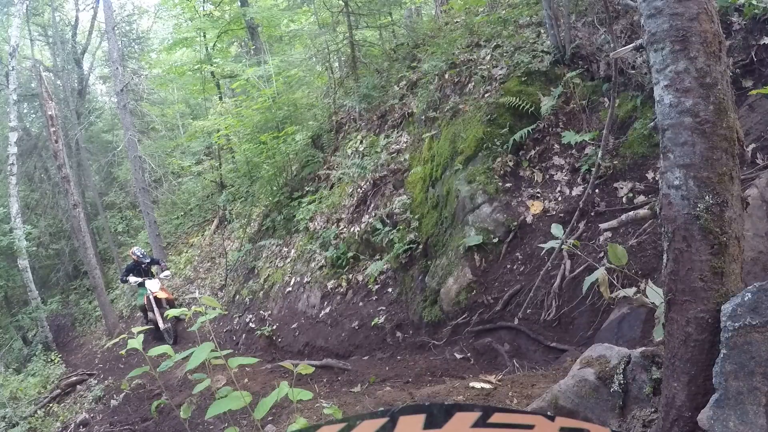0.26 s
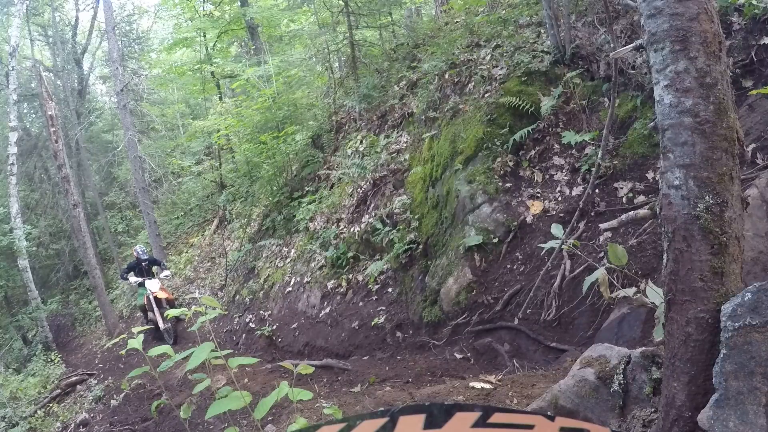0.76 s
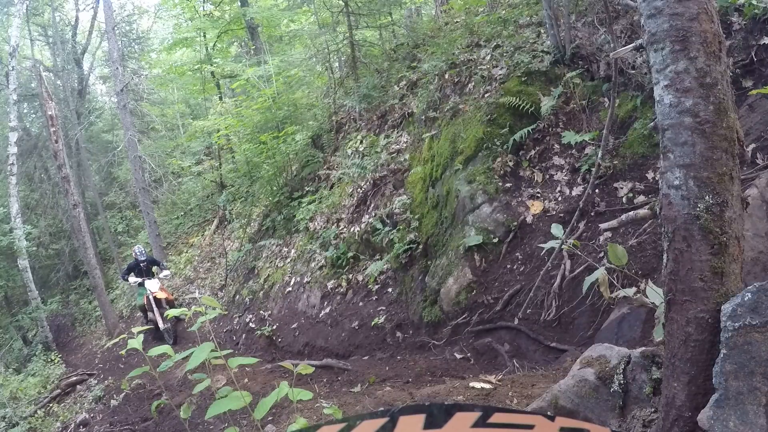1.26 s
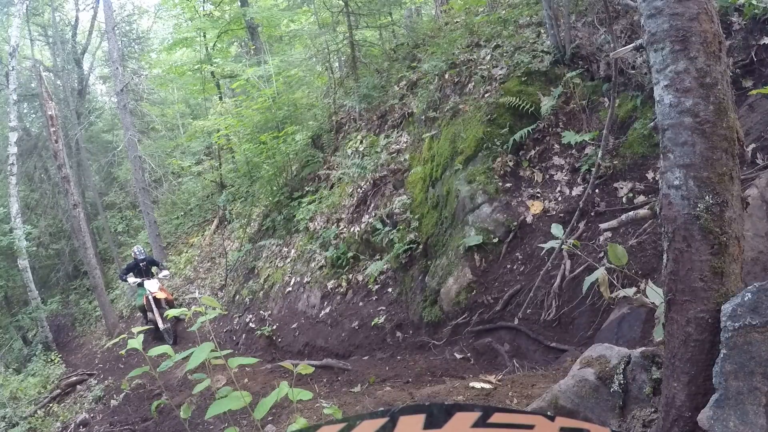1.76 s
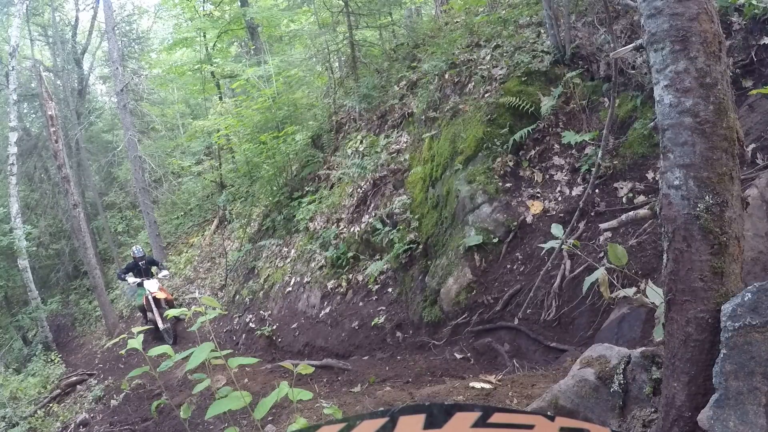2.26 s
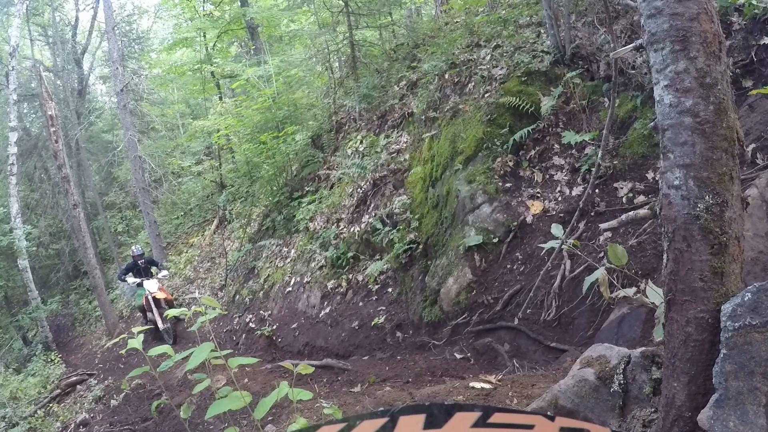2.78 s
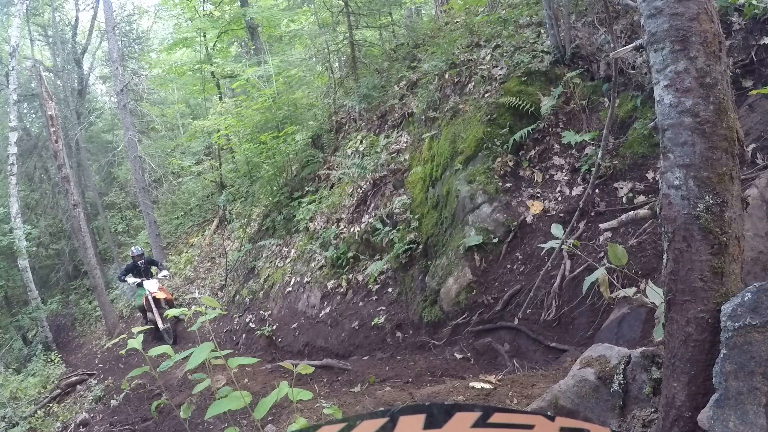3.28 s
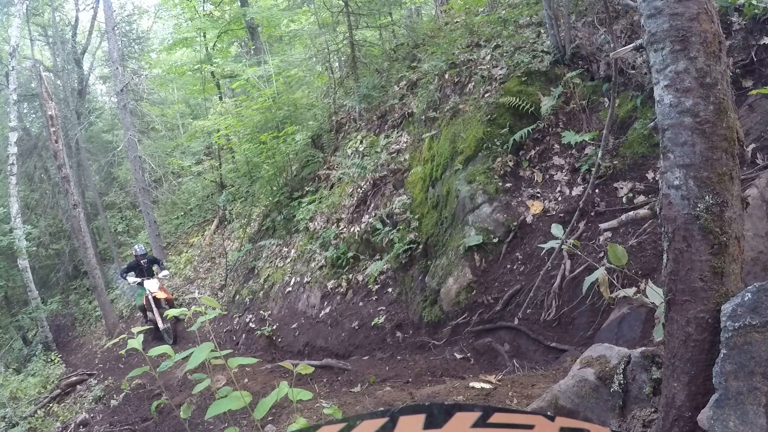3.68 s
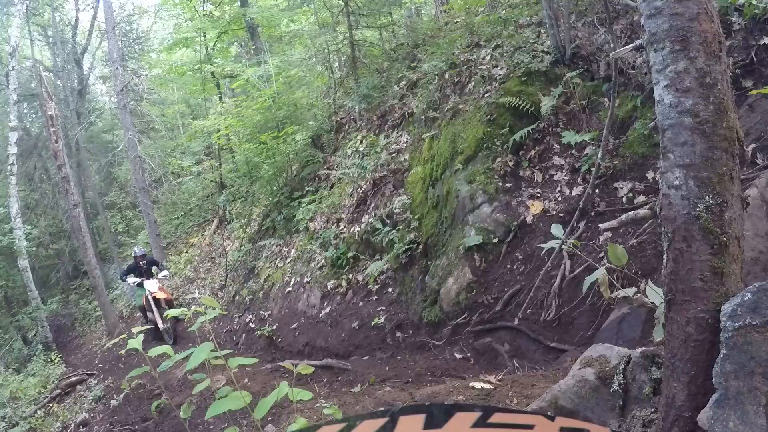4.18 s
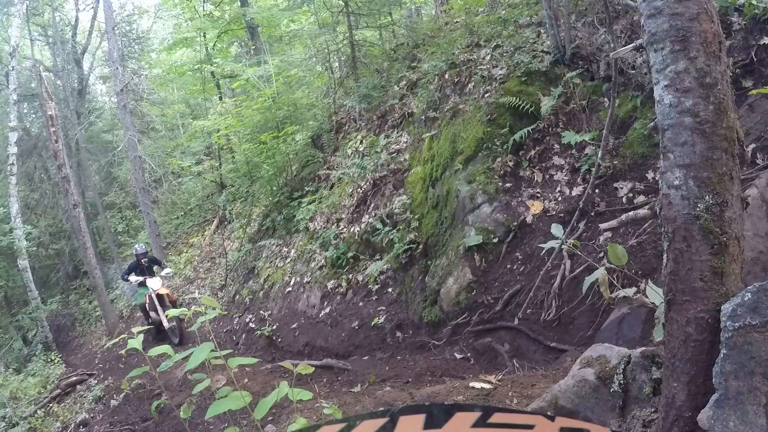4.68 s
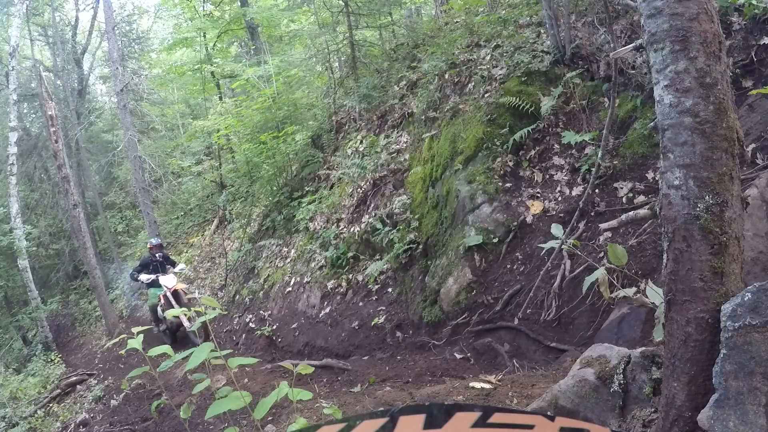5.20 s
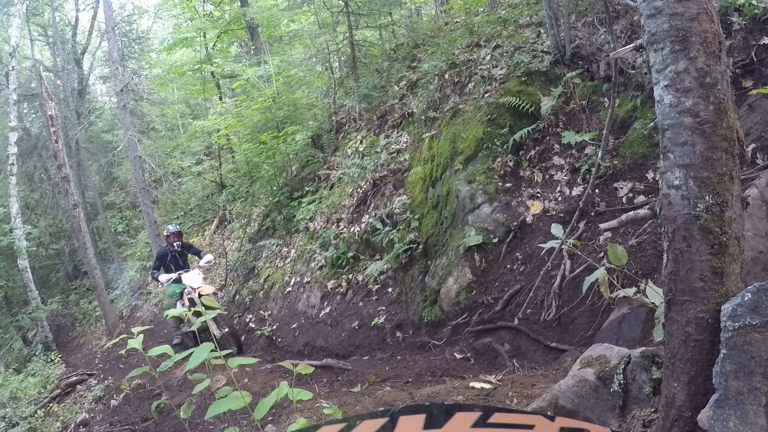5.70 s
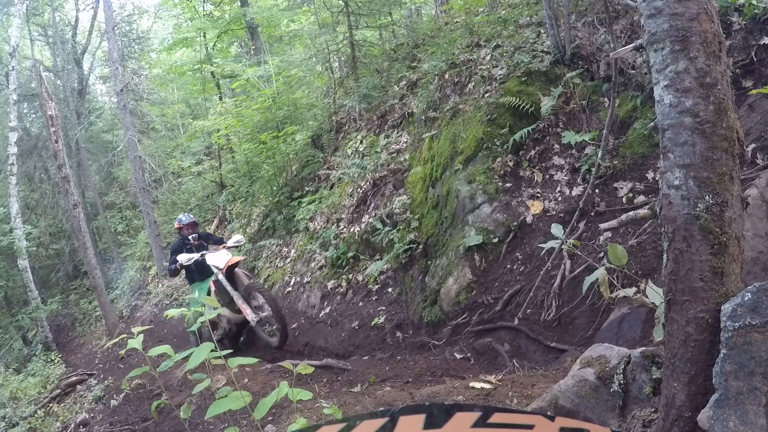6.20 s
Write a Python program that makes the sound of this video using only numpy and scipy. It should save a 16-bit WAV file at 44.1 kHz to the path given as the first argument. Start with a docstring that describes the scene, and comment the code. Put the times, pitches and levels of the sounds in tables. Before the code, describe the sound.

Soft forest hush, then a starter whirrs and knocks with hollow puffs from the exhaust. A two-stroke dirt bike catches with crackling pops and is blipped several times, winding down between blips with metallic rattle. Finally it revs hard and holds a harsh, ringing, wavering buzz to the end. Outdoors, short scattered echoes from trees, low wind rumble on the microphone; the left side is thinner and muffled.

```python
"""In a forest gully, a two-stroke trail bike is cranked, catches, is blipped with misfires, then revs hard uphill.
Each turn of the crank sends a pulse down the exhaust and rattles the cylinder and engine cases.
Strong single firings crack and thump; scattered echoes from the trees answer.
The left microphone port is muffled, inverted and a little late; wind rumbles in both ports."""
import sys
import numpy as np
from scipy import signal
from scipy.fft import rfft, irfft, next_fast_len
from scipy.io import wavfile
from scipy.ndimage import uniform_filter1d, map_coordinates

SR = 44100
rng = np.random.default_rng(int(sys.argv[2]) if len(sys.argv) > 2 else 0)


def transcribe(u):
    """Save the signal u as a 16-bit wav file named by the first command-line argument.

    u: samples, shape (n,) or (channels, n), limited to [-1, 1]; the rate is SR.
    q: integer samples, one column per channel.
    """
    v = np.clip(np.atleast_2d(u).T, -1, 1)
    q = np.round(v * 32767).astype(np.int16)
    wavfile.write(sys.argv[1], SR, q)


N = 284445

# All levels in the tables are relative: each layer gets a further boost or cut where it is used.
# Single strong firings among the misfires. Each row: time in seconds, level in dB, level of its crack in dB.
BANGS = [(1.266, -11.5, -43), (1.312, -19, -48), (1.331, -23, -38), (1.369, -19, -35), (1.394, -21, -38),
         (1.412, -18, -32.5), (1.427, -10.5, -37), (1.446, -19, -32), (1.466, -10, -24), (1.483, -15, -47),
         (1.924, -15, -59), (1.947, -18, -41), (1.966, -11, -31), (1.987, -9, -31), (2.007, -14, -45),
         (2.022, -8.5, -24.5), (2.04, -10, -35), (2.056, -14.5, -30), (2.07, -15, -27), (2.363, -20, -55),
         (2.379, -19, -50), (2.404, -12.5, -30), (2.421, -13, -32), (2.435, -15, -33), (2.452, -16, -35),
         (2.465, -9.5, -32), (2.478, -12, -27), (2.498, -20, -24.5), (2.513, -15, -24), (3.034, -18, -39),
         (3.069, -12, -26.5), (3.136, -13, -31), (3.207, -16, -26.5), (3.471, -22.5, -38),
         (3.494, -12.5, -31), (3.516, -21, -39), (3.542, -14, -27.5), (3.561, -22, -38), (3.579, -12, -35),
         (3.6, -13, -26), (3.619, -13, -42), (3.672, -15.5, -35), (3.934, -23, -49), (3.957, -16, -27.5),
         (3.978, -19, -60), (4.003, -14, -31.5), (4.05, -17.5, -32), (4.089, -15, -31), (4.127, -11.5, -32),
         (4.149, -15, -35), (4.182, -13.5, -31.5), (4.201, -11, -39)]
# Colour of the low exhaust pulse. Each row: frequency in Hz, level in dB.
BOOM = [(40, -39.5), (90, -9.5), (150, -0.5), (215, -1), (270, -4.5), (330, -10.5), (390, -19), (600, -59),
        (4000, -110)]
# Colour of the harsher, higher exhaust pulse. Each row: frequency in Hz, level in dB.
BARK = [(330, -61.5), (410, -16), (480, 5), (540, 4), (600, -2.5), (650, -0.5), (740, -7.5), (830, -7.5),
        (930, -24), (1080, -11), (1160, -22), (1250, -33), (1600, -20.5), (1900, -39), (2500, -36),
        (3500, -81), (9000, -110)]
# Colour of the rattling engine. Each row: frequency in Hz, level in dB.
RATTLE = [(100, -11), (250, -7), (390, -8), (550, 0.5), (760, -2), (920, -4.5), (1080, -2), (1260, -12.5),
          (1450, -4), (1600, -2.5), (1900, -3), (2200, -9.5), (2500, -13), (3000, -19.5), (3600, -20),
          (4500, -55.5)]
# Colour of the bright cooling fins. Each row: frequency in Hz, level in dB.
FINS = [(2300, -34), (2700, -24), (3100, -16), (3700, -12), (4400, -14.5), (5200, -7), (6000, -2.5),
        (6600, -6), (7300, -9.5), (8000, -15.5), (10000, -22), (12000, -33.5), (14500, -42.5)]
# Colour of the quiet forest, also of the right channel's own noise. Each row: frequency in Hz, level in dB.
WOODS = [(15, -36), (108, -46), (135, -1), (170, -1), (400, -3), (900, -5), (2000, -14.5), (4300, -26),
         (6500, -22), (9500, -25), (12000, -31), (14800, -38)]


def amp(db):
    """Turn decibels into a plain multiplier."""
    return 10 ** (np.asarray(db) / 20)


def unit(x):
    """Scale a sound to an rms of 1."""
    return x / np.sqrt(np.mean(x ** 2, axis=-1, keepdims=True) + 1e-20)


def along(points, hz):
    """Read a value between (Hz, value) points on a log frequency axis."""
    f, v = np.transpose(points)
    return np.interp(np.log(hz + 1), np.log(f + 1), v)


def curves(rows):
    """One value per sample for each column, then a gate that is open while the table lasts."""
    s, *cols = np.transpose(rows)
    t = np.arange(N) / SR
    gate = np.clip(np.minimum(t - s[0], s[-1] + .03 - t) / .03, 0, 1)
    return [np.interp(t, s, c) for c in cols] + [gate]


def wobble(rate):
    """A smooth random curve with rate knots a second."""
    coarse = np.arange(0, N + 64, 64)
    knots = rng.standard_normal(int(N * rate / SR) + 4)
    return np.interp(np.arange(N), coarse, map_coordinates(knots, [coarse * rate / SR]))


def filtered(x, response):
    """Multiply the spectrum of x by a (complex) response of frequency."""
    m = next_fast_len(N + SR // 2)
    return irfft(rfft(x, m) * response(np.fft.rfftfreq(m, 1 / SR)), m)[..., :N]


def noise(spectrum):
    """Coloured noise with an rms of 1."""
    return unit(filtered(rng.standard_normal(N), lambda hz: amp(along(spectrum, hz))))


def pulse(spectrum, spread=0, size=4096):
    """A pulse of this spectrum with a peak of 1; each band may arrive up to spread seconds late."""
    hz = np.fft.rfftfreq(size, 1 / SR)
    # folding the cepstrum forward puts the energy as early as the spectrum allows
    cepstrum = irfft(np.log(amp(along(spectrum, hz))), size)
    cepstrum[1:size // 2] *= 2
    cepstrum[size // 2 + 1:] = 0
    bands = np.arange(0, SR, 120)
    late = spread * np.interp(hz, bands, rng.random(len(bands)))
    p = irfft(np.exp(rfft(cepstrum) - 2j * np.pi * np.cumsum(late) * hz[1]), size)[:size // 2]
    return p / abs(p).max()


def strikes(times, gains, shape):
    """One copy of shape at each time."""
    train = np.bincount(np.round(times * SR).astype(int), gains, N)[:N]
    return signal.fftconvolve(train, shape)[:N]


def level(x, seconds):
    """Running rms."""
    return np.sqrt(abs(uniform_filter1d(x ** 2, int(seconds * SR))) + 1e-12)


def metal(spectrum):
    """Broad noise from the engine's castings, flickering in level."""
    return amp(1.15 * wobble(28)) * noise(spectrum)


def decay(t60, attack=0):
    """A half-second envelope that falls 60 dB in t60 seconds, with an optional soft start."""
    t = np.arange(1, SR // 2 + 1) / SR
    return amp(-60 * t / t60) * (1 - np.exp(-t / (attack + 1e-6)))


def forest_air():
    """The quiet forest: soft coloured noise that swells and sinks gently."""
    return amp(-48.0) * amp(1.4 * wobble(12.4)) * noise(WOODS)


def starter_whirr():
    """The starter's gears make coloured noise that follows the cranking."""
    # Level of the whirr. Each row: time in seconds, level in dB.
    whirr_levels = [(0.7, -47), (0.788, -43), (0.908, -43.5), (1.024, -44), (1.24, -37.5), (1.35, -52)]
    # Colour of the whirr. Each row: frequency in Hz, level in dB.
    gear_colour = [(300, 0.5), (900, -0.5), (1300, -6.5), (1900, 3), (2300, -12), (2800, -26), (3400, -10),
                   (4500, -10), (6000, -10), (8000, -10), (11000, -32), (14500, -49)]
    whirr_db, turning = curves(whirr_levels)
    return turning * amp(whirr_db + 3.5) * metal(gear_colour)


def cold_pipe():
    """Unfired compressions puff into the cold pipe, which rings like a blown bottle."""
    # Puffs let into the pipe. Each row: time in seconds, level in dB.
    puffs = [(0.91, -30), (1.002, -24.5), (1.085, -22.5), (1.164, -21), (1.227, -28.5)]
    # Tones of the pipe. Each row: frequency in Hz, level in dB, time to fall 60 dB in seconds.
    pipe_tones = [(224.6, 1, 0.13), (305, -6, 0.076), (166, -11, 0.13)]
    t = np.arange(SR // 2) / SR
    ring = sum(amp(db) * decay(t60, attack=0.0013) * np.sin(2 * np.pi * hz * t)
               for hz, db, t60 in pipe_tones)
    ring *= np.clip((.05 - t) / 0.02, 0, 1)  # the piston shuts the port again
    s, db = np.transpose(puffs)
    return strikes(s, amp(db + 9.5), ring)


def gear_knocks():
    """Starter gears knock: a short unsteady tone, a burst of fin noise and a high ping from one fin."""
    # Knocks. Each row: time in seconds, level of the tone in dB, its pitch in Hz, level of the fins in dB.
    clacks = [(0.741, -28, 1820, -30), (0.7944, -43, 1980, -51), (0.824, -36, 1710, -34.5),
              (0.835, -38, 2970, -43), (0.841, -33, 1460, -32), (0.863, -37, 3490, -41),
              (0.865, -39, 2400, -48), (0.884, -41, 3600, -55), (0.9537, -20.5, 1660, -25.5),
              (1.0407, -24.5, 1880, -27), (1.1231, -30, 2130, -27), (1.2003, -30, 2110, -27),
              (1.2928, -36, 1600, -27.5)]
    ping_hz = 5860
    t = np.arange(SR // 2) / SR
    tones = np.zeros(N + SR)
    for s, db, hz, _ in clacks:
        waver = 2.0 * np.cumsum(rng.standard_normal(len(t))) / np.sqrt(SR * 0.0094)
        tone = decay(0.04, attack=0.0018) * np.sin(2 * np.pi * hz * t + waver)
        tones[round(s * SR):][:len(t)] += amp(db + 8.5) * tone
    s, *_, fins_db = np.transpose(clacks)
    burst = decay(0.33, attack=0.00065) * 0.44 + decay(0.025, attack=0.00074)
    ping = decay(0.045, attack=0.0022) * np.sin(2 * np.pi * ping_hz * t)
    return tones[:N] + strikes(s, amp(fins_db), burst) * metal(FINS) + strikes(s, amp(fins_db + 2), ping)


def trees(x):
    """Scattered echoes: a fading noise tail, different at each port, repeats the bike a moment late."""
    # How long the echoes last. Each row: frequency in Hz, time to fall 60 dB in seconds.
    echo_times = [(150, 0.24), (2000, 0.47), (10000, 0.31)]
    hz, t, z = signal.stft(rng.standard_normal((2, SR // 2)), SR, nperseg=256)
    tail = signal.istft(z * amp(-60 * t / along(echo_times, hz)[:, None]), SR, nperseg=256)[1]
    late = np.pad(x, (700, 0))[None]  # in samples
    return signal.fftconvolve(late, tail / np.linalg.norm(tail[0]), axes=1)[:, :N]


def throttle():
    """Load and unevenness 0-1, as each twist rises, holds and shuts; and the strength of the clatter."""
    # Twists of the throttle, the last held for the climb. Each row: opens in seconds, full in seconds,
    # shuts in seconds, load 0-1, unevenness of burning 0-1.
    twists = [(1.195, 1.426, 1.451, 0.99, 0.56), (1.784, 1.955, 1.982, 0.86, 0.51),
              (2.342, 2.416, 2.45, 1, 0.43), (2.97, 3.01, 3.23, 0.26, 0.1), (3.454, 3.54, 3.69, 0.24, 0.3),
              (3.886, 3.95, 4.04, 0.59, 0.4), (4.097, 4.198, 6.4, 0.86, 0.2)]
    # Bursts of clatter from the castings, and one lull (negative). Each row: starts in seconds,
    # rise in seconds, eases in seconds, dying time in seconds, strength.
    clatter_bursts = [(1.29, .1, 1.47, .05, .8), (1.955, .004, 2.075, .07, .8), (2.396, .003, 2.53, .3, .7),
                      (3.06, .003, 3.23, .05, .2), (3.487, .004, 3.68, .04, .55),
                      (3.82, .09, 3.947, .002, -.65), (4.175, .004, 4.3, .1, .4)]
    shut_s = 0.029  # the throttle snaps shut
    t = np.arange(N) / SR
    opens, full, shuts, load, uneven = np.transpose(twists)[..., None]
    held = np.clip(np.minimum((t - opens) / (full - opens), 1 + (shuts - t) / shut_s), 0, 1)
    starts, rise, eases, dies, strength = np.transpose(clatter_bursts)[..., None]
    fading = np.exp(-np.clip(t - eases, 0, None) / dies)
    clatter = strength * np.clip((t - starts) / rise, 0, 1) * fading
    return (load * held).max(axis=0), (uneven * np.sqrt(held)).max(axis=0), clatter.sum(axis=0)


def controls(speed):
    """Levels in dB of boom, bark, rattle, fins, first and second order, and the unevenness of burning."""
    # The climb's tones and boom; an order is a tone at that multiple of the turn rate.
    # Each row: time in seconds, first order in dB, second order in dB, boom in dB.
    climb_tones = [(4.2, -42, -33, -20), (4.32, -44, -31.5, -22), (4.37, -34, -29.5, -26.5),
                   (4.5, -27, -19.5, -24), (4.75, -28.5, -21, -21.5), (4.87, -34, -24, -23),
                   (4.94, -43, -30, -22.5), (5.04, -31.5, -49, -22.5), (5.12, -38, -28, -25),
                   (5.3, -34, -21.5, -25), (5.55, -38.5, -24, -25), (5.73, -49, -19, -33),
                   (5.79, -34, -27, -31), (5.86, -27.5, -28, -19), (5.99, -34.5, -28, -38),
                   (6.16, -31.5, -23, -33), (6.26, -36.5, -27, -23.5), (6.36, -36.5, -28.5, -23.5),
                   (6.45, -44, -23, -39)]
    # The climb's rougher layers. Each row: time in seconds, bark in dB, rattle in dB, fins in dB.
    climb_layers = [(4.2, -31, -33.5, -38.5), (4.38, -32, -26.5, -31), (4.51, -27, -26, -24.5),
                    (4.75, -29.5, -26.5, -25.5), (4.93, -27.5, -29, -23), (5.01, -34, -31.5, -32.5),
                    (5.17, -26.5, -29, -30.5), (5.35, -29.5, -27, -25), (5.62, -25.5, -29.5, -29),
                    (5.75, -26.5, -28, -25), (5.88, -29.5, -29, -23), (6.02, -36, -27.5, -23),
                    (6.12, -30.5, -26, -21.5), (6.26, -24, -29.5, -28), (6.38, -25.5, -28.5, -34.5),
                    (6.45, -23, -27.5, -28.5)]
    # Second order while coasting. Each row: frequency in Hz, level in dB.
    coast_drone = [(70, -66), (92, -41.5), (105, -41), (124, -53.5), (138, -63), (152, -38), (170, -40)]
    # Moments when the climbing engine falters. Each row: time in seconds, added unevenness 0-1.
    stumbles = [(5.03, 0.27), (5.82, 0.11)]
    stumble_s = 0.048
    climb_s, climb_fade_s = 4.19, .05
    first_idle_db, drone_loaded_db = -69, -29.5  # first order off the climb, second order at full load
    uneven_coast, steady_turns, clears_turns = .05, 86, 30  # turns a second; speed steadies the burning
    t = np.arange(N) / SR
    load, rough, clatter = throttle()
    climbing = np.clip((t - climb_s) / climb_fade_s + .5, 0, 1)

    def law(idle_db, octave_db, share_db, share):
        """Level at 60 turns a second, plus gain per octave of speed, plus gain with load or clatter."""
        return idle_db + octave_db * np.log2(speed / 60) + share_db * share

    def then(before, climb):
        """Cross from the earlier level to the level on the climb."""
        return before + climbing * (climb - before)

    first_db, second_db, boom_db, _ = curves(climb_tones)
    bark_db, rattle_db, fins_db, _ = curves(climb_layers)
    drone_db = along(coast_drone, 2 * speed)
    uneven = uneven_coast * (1 - climbing) + rough * np.clip((steady_turns - speed) / clears_turns, 0, 1)
    uneven += sum(depth * np.exp(-((t - s) / stumble_s) ** 2) for s, depth in stumbles)
    return (then(law(-44, 2.9, 31.2, load), boom_db),
            then(law(-48, 10.7, 15.4, load), bark_db),
            then(law(-36, 7.8, 4.4, clatter), rattle_db),
            then(law(-41, 4.9, 7.6, clatter), fins_db),
            then(first_idle_db, first_db),
            then(drone_db + (drone_loaded_db - drone_db) * load, second_db),
            np.clip(uneven, 0, 1))


def crank(speed):
    """Turns done; the crank hurries or lags a little so each strong firing falls on a whole turn."""
    catch_up_s = .04
    turns, s = np.cumsum(speed) / SR, np.transpose(BANGS)[0]
    slip = np.unwrap(turns[np.round(s * SR).astype(int)] % 1, period=1)
    knots = np.ravel([np.maximum(s[:-1], s[1:] - catch_up_s), s[1:]], order="F")
    slips = np.ravel([slip[:-1], slip[1:]], order="F")
    return turns - np.interp(np.arange(N) / SR, knots, slips)


def coasting(speed, turns):
    """With the throttle shut the engine pumps air evenly: clean orders that wind down through the pipe."""
    # The pipe's gain while coasting. Each row: frequency in Hz, level in dB.
    pipe_gain = [(130, -49), (180, -47), (250, -33), (300, -63), (345, -53), (400, -35), (460, -33.5),
                 (520, -51), (590, -49), (680, -54)]
    # Strength of each order. Each row: multiple of the turn rate, level in dB.
    orders = [(3, 0), (4, -7), (5, -5), (6, 0), (7, -2), (8, -5)]
    shut = (1 - np.clip(3 * throttle()[0], 0, 1)) ** 2
    tones = np.zeros(N)
    for k, db in orders:
        gain = amp(along(pipe_gain, k * speed) + db + 2 * wobble(6))
        tones += gain * np.sin(2 * np.pi * k * turns + k * k)
    return shut * tones


def drifting(times, gains, spectrum):
    """Knocks whose ring drifts among four shapes of one spectrum."""
    out = np.zeros(N)
    for _ in range(4):
        shape = pulse(spectrum, spread=.009)
        out += amp(3 * wobble(7)) * strikes(times, gains, shape / np.linalg.norm(shape))
    return out / 2.4


def ringing(drive, modes, turned_db, facing_s):
    """Two-pole resonators ring with the drive, each swelling and fading around its own loudest moment."""
    out, t = np.zeros(N), np.arange(N) / SR
    for hz, width, db, loudest in modes:
        r = np.exp(-np.pi * width / SR)
        ring = signal.lfilter([1, 0, -1], [1, -2 * r * np.cos(2 * np.pi * hz / SR), r * r], drive)
        facing_db = turned_db * (1 - np.exp(-((t - loudest) / facing_s) ** 2))
        out += amp(db + 4.5 + facing_db + 2.4 * wobble(16)) * np.sqrt(1 - r) * ring
    return out


def exhaust(speed, turns, times, size, edge, levels):
    """Each turn sends a low boom and a smeared bark down the pipe; steady tones follow the turn rate."""
    boom_db, bark_db, _, _, first_db, second_db, uneven = levels
    per_turn = np.sqrt(SR / speed)  # keeps the rms near 1 at any speed
    gap = abs(times[:, None] - np.transpose(BANGS)[0]).min(axis=1) * speed[np.round(times * SR).astype(int)]
    ordinary = gap > .5  # a strong firing takes the place of the ordinary boom
    low, high = pulse(BOOM), pulse(BARK, spread=0.01203)  # smeared by the silencer's baffles
    boom = per_turn * strikes(times, ordinary * amp(5 * size), low / np.linalg.norm(low))
    boom += 1.2 * uneven * noise(BOOM)
    bark = per_turn * strikes(times, amp(5 * size + 6 * edge), high / np.linalg.norm(high))
    bark += 3 * uneven ** 2 * noise(BARK)
    first = amp(first_db + 11) * np.sin(2 * np.pi * turns + 0.2 * wobble(12))
    second = amp(second_db + 9) * np.sin(2 * 2 * np.pi * turns + 0.77 + 0.15 * wobble(10))
    return amp(boom_db + 2.0) * boom + first + second + amp(bark_db + 6.5) * bark + coasting(speed, turns)


def castings(speed, turns, times, edge, levels):
    """Piston knocks shake the cylinder, fins and cases: beating noise, repeated knocks and ringing modes."""
    # Gritty top that joins the fins at steady high revs. Each row: frequency in Hz, level in dB.
    spray_colour = [(5000, -40), (7500, -2), (9000, 6.5), (11000, -8.5), (13000, -10), (15000, -40)]
    # Modes of the engine cases. Each row: frequency in Hz, width in Hz, level in dB, loudest in seconds.
    case_modes = [(1602, 52, -2, 2.5), (1584, 44, -3, 5.2), (1611, 48, -5, 5.55), (1630, 38, -1.5, 6.38),
                  (1790, 51, 0, 4.9), (1943, 30, -3, 5.98), (2110, 50, -3.5, 5.3)]
    # Modes of the cooling fins, each loudest when the leaning bike turns it toward the microphones.
    # Each row: frequency in Hz, width in Hz, level in dB, loudest in seconds.
    fin_modes = [(3590, 26, -10, 6.2), (3750, 46, -11, 5.93), (4125, 32, -3, 5.72), (4706, 34, 0, 6.05),
                 (5260, 43, -5, 6.05), (5686, 40, 1, 5.84), (6030, 39, 7, 5.36), (6200, 32, 2, 5.58),
                 (6380, 36, 7, 5.8), (7027, 35, -3, 6.0), (5700, 36, 5, 4.95), (6050, 42, 0, 6.08)]
    knocks_from, knocks_full = 40, 100  # turns a second
    scatter_s, scatter_db = 2e-5, 1.2  # no two knocks of the piston are quite alike
    _, _, rattle_db, fins_db, _, _, uneven = levels
    per_turn = np.sqrt(SR / speed)

    def beat(depth):
        """Noise is loudest just after the port opens."""
        return unit(1 + depth * np.exp(-3.5 * (turns % 1)))

    # fast, even burning repeats one knock every turn
    steady = np.clip(1 - 2.5 * uneven, 0, 1) * np.interp(speed, [knocks_from, knocks_full], [0, 1])
    shift, weight = rng.standard_normal((len(times), 2)).T
    knocks = per_turn * drifting(times + scatter_s * shift, amp(3.6 * edge + scatter_db * weight), RATTLE)
    rattle = (1 - .55 * steady) * beat(.5) * metal(RATTLE) + 1.1 * steady * knocks
    rasp = per_turn * drifting(times, amp(3 * edge), FINS)
    fins = (1 - .35 * steady) * beat(.22) * metal(FINS) + .65 * steady * rasp
    fins += amp(-21) * steady * beat(1.5) * amp(3.8 * wobble(60)) * noise(spray_colour)
    slap = per_turn * strikes(times, amp(3.9 * edge), [1])
    slap += (0.36 + 1.0 * (1 - steady)) * rng.standard_normal(N)
    slap = filtered(slap, lambda hz: 1 / (1 + 1j * hz / 8500) ** 4)
    slap *= (speed / 110) ** 1.22  # the piston slaps harder at speed
    case_ring = ringing(amp(rattle_db - 4.5) * slap, case_modes, turned_db=-10, facing_s=0.097)
    fin_ring = ringing(amp(fins_db - 6.0) * slap, fin_modes, turned_db=-9.5, facing_s=0.24)
    return amp(rattle_db + 4.0) * rattle + amp(fins_db + 5.0) * fins + case_ring + fin_ring


def engine():
    """One firing a turn drives exhaust and castings; uneven burning scatters its size and time."""
    # Crankshaft speed. Each row: time in seconds, turns per second.
    shaft = [(1.25, 34.2), (1.45, 61.5), (1.54, 62.5), (1.9, 45.7), (2.0, 52.2), (2.06, 64.2), (2.12, 68.1),
             (2.35, 57.7), (2.55, 84.1), (2.77, 74.4), (3.13, 56.1), (3.31, 51.8), (3.41, 46.2),
             (3.48, 46.4), (3.63, 56.2), (3.71, 57.0), (3.81, 49.5), (3.92, 44.7), (4.13, 52.9),
             (4.2, 60.1), (4.32, 80.1), (4.41, 98.2), (4.49, 107.4), (4.54, 109.3), (4.62, 106.3),
             (4.87, 118.2), (4.94, 106.1), (5.05, 90.3), (5.12, 95.1), (5.25, 109.4), (5.3, 110.4),
             (5.49, 105.3), (5.61, 107.1), (5.86, 118.4), (5.99, 121.7), (6.16, 113.4), (6.26, 96.9),
             (6.35, 84.1), (6.45, 91.6)]
    speed, running = curves(shaft)
    levels = controls(speed)
    uneven = levels[-1]
    turns = crank(speed)
    at = np.flatnonzero(np.diff(np.floor(turns)))  # the sample where each turn ends
    late, size, edge = uneven[at] * rng.standard_normal((len(at), 3)).T
    times = np.clip(at / SR + .0002 * late, 0, None)
    pipe = exhaust(speed, turns, times, size, edge, levels)
    return running * (pipe + castings(speed, turns, times, edge, levels))


def wind():
    """Low buffeting, unrelated between the two ports."""
    # Strength of the wind. Each row: time in seconds, level in dB.
    gusts = [(1.25, -69), (1.6, -52), (2.05, -39), (2.3, -46), (2.9, -41.5), (3.4, -49), (3.78, -43),
             (4.35, -34), (4.6, -44), (5.03, -39), (5.45, -42), (5.67, -36), (6.05, -45), (6.2, -41),
             (6.45, -41)]
    db, blowing = curves(gusts)
    low = [(8, 2.5), (20, -1.5), (50, -2.5), (100, -10.5), (200, -14.0), (400, -91)]  # Hz, dB
    buffets = [amp(3.1 * wobble(7)) * noise(low), amp(3.1 * wobble(9)) * noise(low)]
    return blowing * amp(db + [[4], [-1.5]]) * buffets


def bangs():
    """A full charge fires: a crack through the metal, then one big pulse down the pipe and its return."""
    # Lone metallic ticks while coasting. Each row: time in seconds, level in dB.
    tick_rows = [(2.788, -30), (3.435, -30), (3.812, -28)]
    # Colour of the cases ringing after each crack. Each row: frequency in Hz, level in dB.
    case_colour = [(1400, -40), (1550, -8), (1600, 0), (1660, -8), (1850, -40)]
    echo_s, echo_db = .0105, -6  # the pulse returns from the pipe's closing cone
    crack_lead_s = .008
    s, db, crack_db = np.transpose(BANGS)
    thump = strikes(s, amp(db + 4), pulse(BOOM))
    thump += strikes(s + echo_s, amp(db - 1.5 + echo_db), pulse(BOOM))
    thump += strikes(s, amp(db - 8.5), pulse(BARK, spread=0.00582))
    tick_s, tick_db = np.transpose(tick_rows)
    ticks = strikes(tick_s, amp(tick_db), decay(0.044, attack=0.00091)) * metal(FINS)
    crack = strikes(s - crack_lead_s, amp(crack_db + 1.0), decay(0.075, attack=0.0018))
    crack *= metal(FINS) + 1.6 * metal(RATTLE) + .9 * metal(case_colour)
    return thump + ticks + crack


def left_port(x):
    """The left port passes mainly the middle band, inverted and 80 microseconds late."""
    # Left port against right. Each row: frequency in Hz, level in dB.
    muffle = [(60, -11), (76, -24), (97, -39), (120, -37), (160, -18), (200, -21), (250, -15), (320, -9.5),
              (400, -8), (510, -8), (650, -2.5), (820, -4.5), (1050, 0.5), (1330, -1), (1680, 0),
              (2140, 0.5), (2710, -1), (3440, 0.5), (4700, -13)]

    def port(hz):
        return -amp(along(muffle, hz)) * np.exp(-2j * np.pi * hz * 80e-6) / (1 + (hz / 4800) ** 60)

    return filtered(x, port)


def scene():
    """Bike, echoes and forest reach the two ports; wind is added at each."""
    bike = starter_whirr() + cold_pipe() + gear_knocks() + engine() + bangs()
    air = bike + amp(-15.0) * trees(bike) + forest_air()
    return np.array([left_port(air[0]), air[1]]) + wind()


def record(dry):
    """A wind filter cuts the bass, then fades off; each channel adds noise that sinks when the right
    channel is loud; peaks clip softly; the top is cut off."""
    # Colour of the left channel's own noise. Each row: frequency in Hz, level in dB.
    left_hiss = [(15, -22), (60, -23), (108, -32), (135, -5), (170, 1), (300, -11), (600, -17.5),
                 (1500, -40), (4500, -32), (9500, -32.5), (14800, -47)]
    filter_off_s, filter_fade_s, top_hz = 1.3, .3, 14960
    bass = filtered(dry, lambda hz: 1 / (1 + (hz / 135) ** 16))
    bass_cut = 1 - np.clip((np.arange(N) / SR - filter_off_s) / filter_fade_s, 0, 1) ** 2
    gain = (1 + (level(dry[1], 0.14) / 0.11) ** 2) ** -.4
    own_noise = gain * amp([[-47], [-57]]) * [noise(left_hiss), noise(WOODS)]
    x = dry - bass_cut * bass + own_noise
    x = x / (1 + abs(x / .92) ** 6) ** (1 / 6)
    return filtered(x, lambda hz: hz < top_hz)


dry = scene()
out = record(dry)
transcribe(out)
```